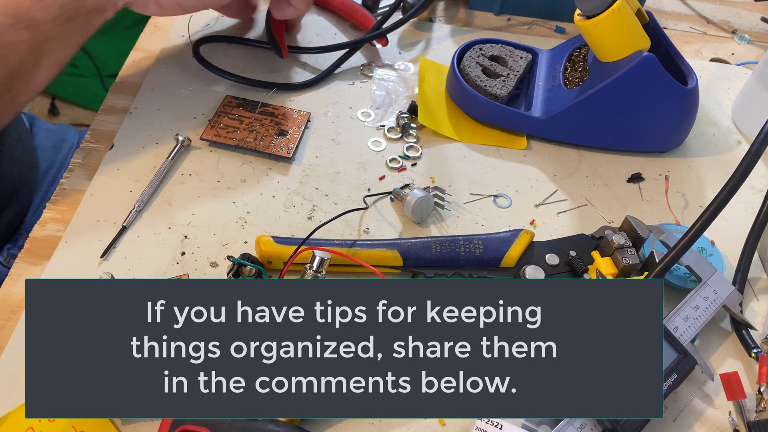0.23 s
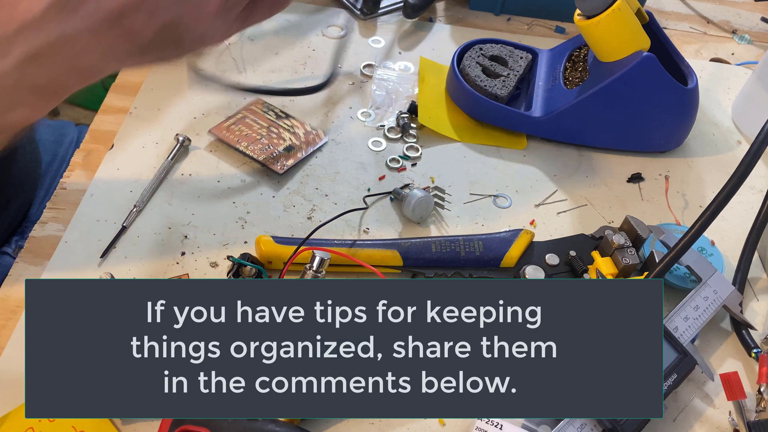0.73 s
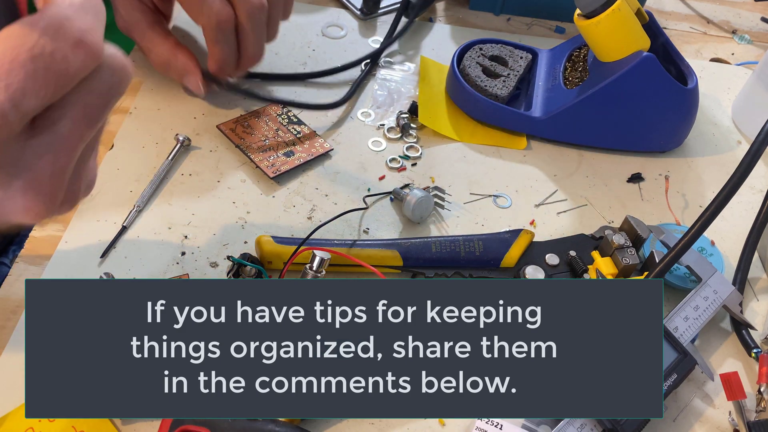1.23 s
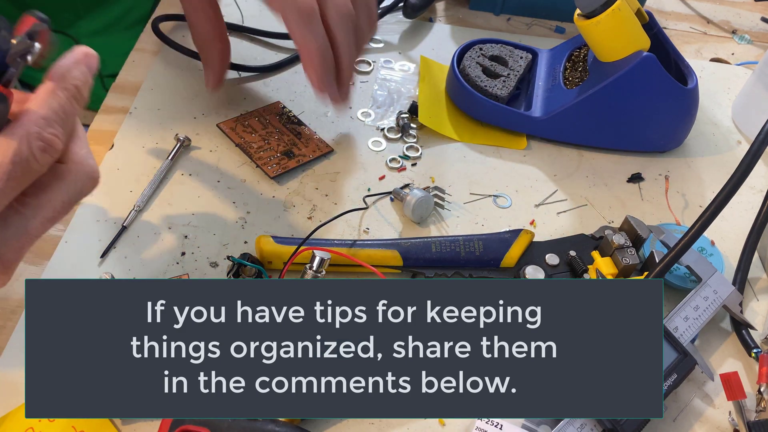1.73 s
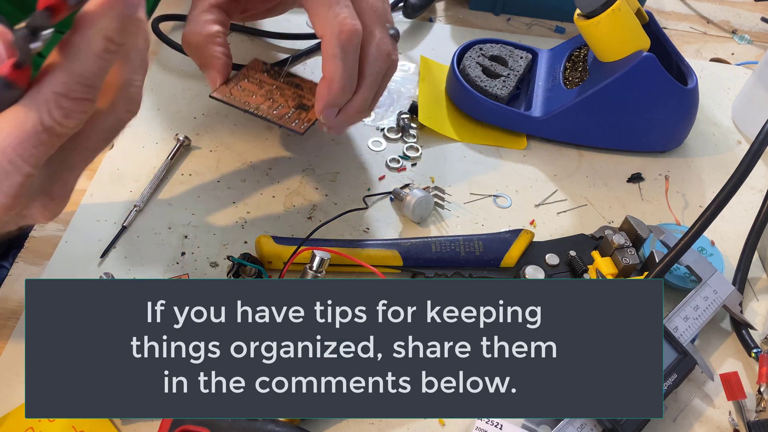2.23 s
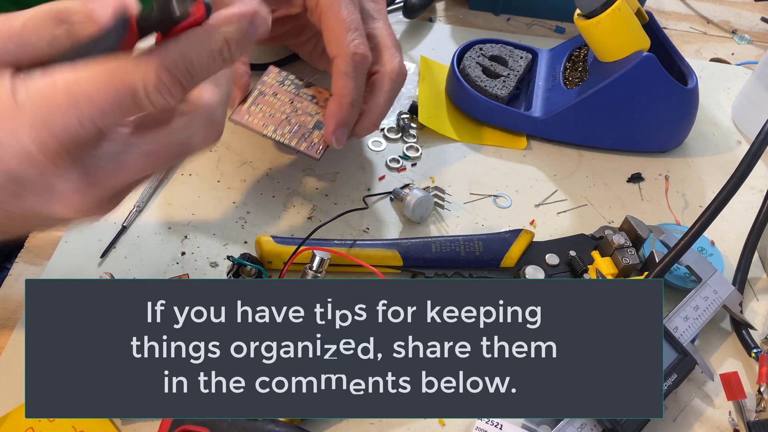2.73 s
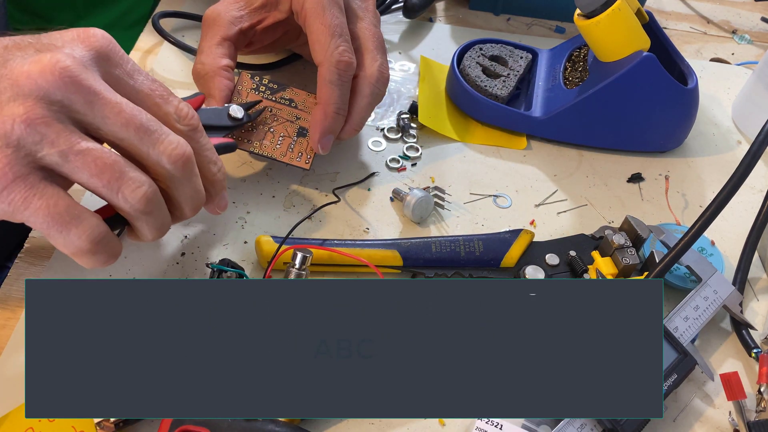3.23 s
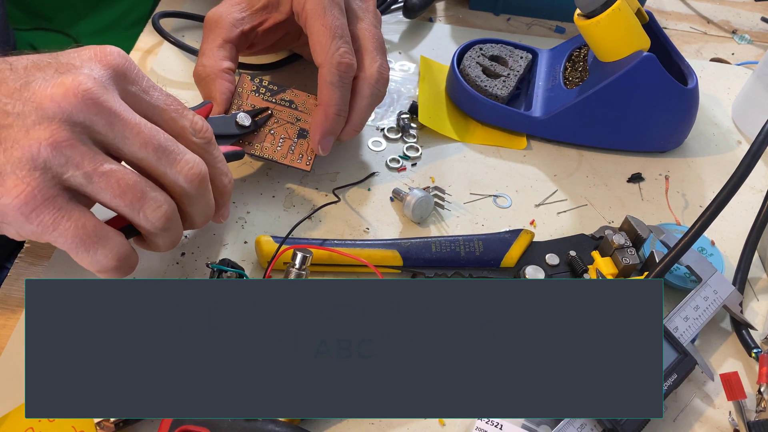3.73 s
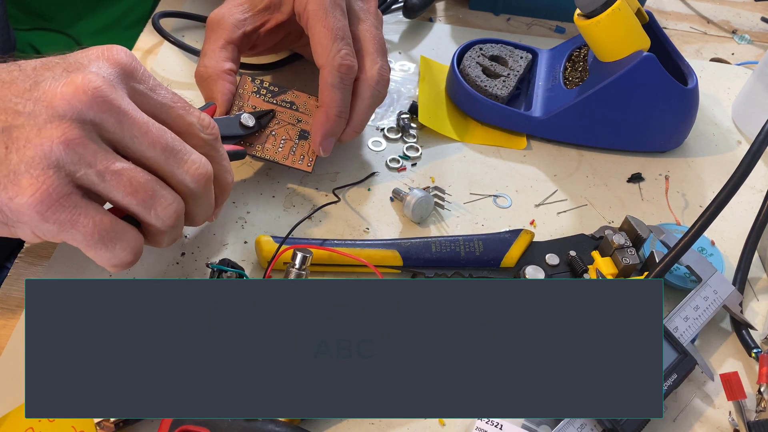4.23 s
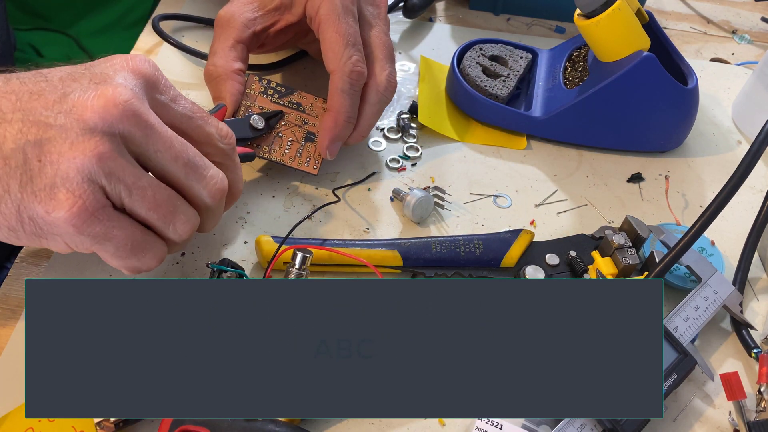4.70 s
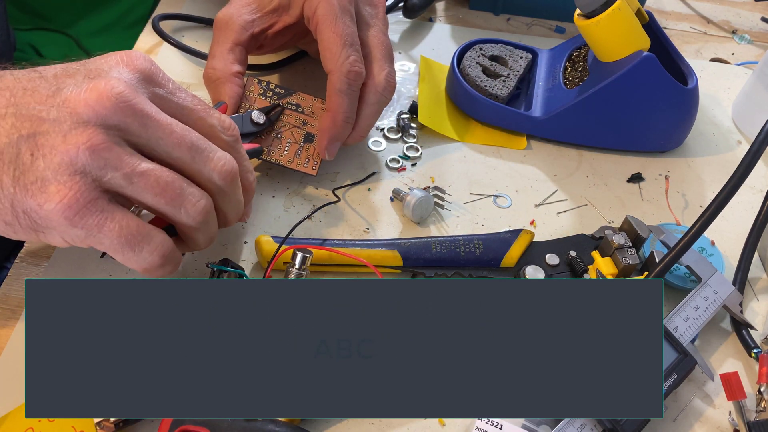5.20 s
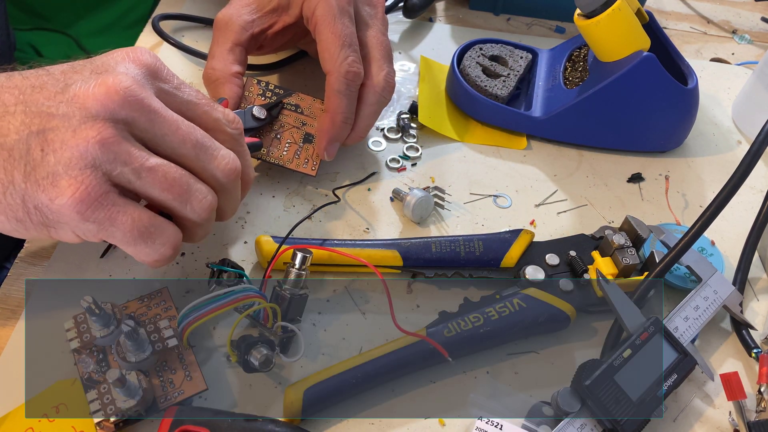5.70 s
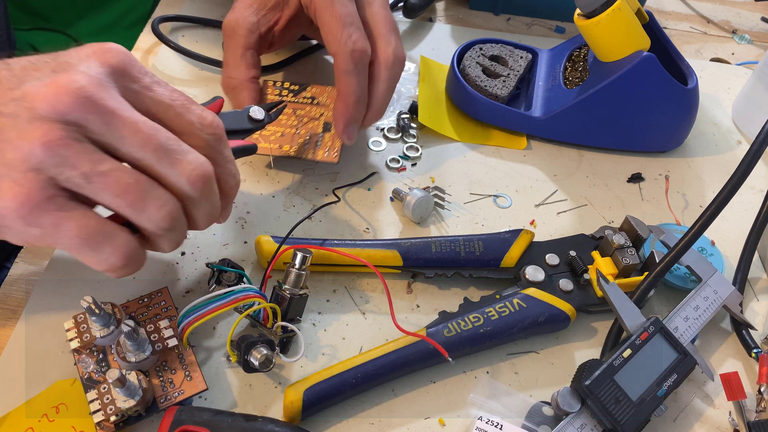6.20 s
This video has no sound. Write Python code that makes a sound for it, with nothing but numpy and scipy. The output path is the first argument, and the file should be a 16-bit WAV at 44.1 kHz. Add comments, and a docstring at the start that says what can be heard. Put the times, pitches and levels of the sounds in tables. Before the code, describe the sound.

A hand tool clatters hard on a cluttered wooden workbench, hands rustle, then small side cutters snip two wire ends over a low uneven room rumble.

```python
"""Tools and small parts on a wooden workbench, heard close up: a tool and a cable knock the bench and a loose
board, each blow built from a gritty click and ringing tones. Shaped noise makes the rubs, rustling hands and
sliding fingertips. Small ticks follow, and side cutters touch a circuit board, then snip two wire ends with
a burst of noise ringing the steel jaws. A low room rumble and a rush of air swell unevenly underneath."""
import sys
import numpy as np
from scipy import signal
from scipy.fft import rfft, irfft, next_fast_len
from scipy.io import wavfile
from scipy.ndimage import uniform_filter1d, map_coordinates

SR = 44100
rng = np.random.default_rng(int(sys.argv[2]) if len(sys.argv) > 2 else 0)


def to_wav(sig):
    """Store sig (one row per channel, or 1-D mono) as 16-bit WAV at the path in sys.argv[1].

    Samples outside -1..1 are clipped; the rate is SR.
    """
    pcm = np.clip(np.atleast_2d(sig), -1, 1) * 32767
    pcm = np.round(pcm).astype(np.int16)
    wavfile.write(sys.argv[1], SR, pcm.T)  # frames by channels


N = 284489
T = np.arange(SR // 4) / SR  # s, the clock of one short sound: a quarter second at most
SNAP_S = 0.0013  # the snap comes this long after the start


def amp(db):
    """Turn decibels into a plain multiplier."""
    return 10 ** (np.asarray(db) / 20)


def unit(x):
    """Scale a sound to an rms (average strength) of 1."""
    return x / np.sqrt(np.mean(x ** 2) + 1e-20)


def peak_one(x):
    """Scale a sound so its highest point is 1."""
    return x / np.abs(x).max()


def along(points, hz):
    """Read a curve of (pitch_hz, value) points, with pitch on a log axis."""
    point_hz, value = np.transpose(points)
    return np.interp(np.log(hz + 1), np.log(point_hz + 1), value)


def level_curve(points):
    """Join (time_s, level_db) points into one level per sample."""
    time_s, level_db = np.transpose(points)
    return np.interp(np.arange(N) / SR, time_s, level_db)


def wobble(rate):
    """A smooth random curve through this many random points a second."""
    knots = rng.standard_normal(int(N * rate / SR) + 4)
    return map_coordinates(knots, [np.arange(N) * rate / SR])


def filtered(x, response):
    """Multiply each frequency of a sound by a complex response."""
    size = next_fast_len(x.shape[-1] + 8192)
    spectrum = rfft(x, size) * response(np.fft.rfftfreq(size, 1 / SR))
    return irfft(spectrum, size)[..., :x.shape[-1]]


def peak(f, hz, width_hz):
    """One resonance: it passes its own pitch best and rings only after it is struck."""
    return 1j * f * width_hz / (hz * hz - f * f + 1j * f * width_hz + 1e-9)


def resonances(f, rows, power):
    """Add several resonances; flipping every other sign avoids deep gaps between them."""
    return sum((-1) ** k * amp(db) * peak(f, hz, width_hz) ** power
               for k, (hz, width_hz, db) in enumerate(rows))


# how alike left and right are: pitch_hz, likeness (1 = the same)
LIKENESS = [(60, 1), (250, 0.92), (950, 0.024), (15000, 0.077)]
# how much stronger left is than right: pitch_hz, left_over_right_db
LEFT_LEAN = [(60, -3), (2380, 3)]


def stereo_noise(gain):
    """Noise of rms 1 with a shared middle and opposite sides; more middle makes the channels more alike."""
    def middle_and_side(hz):
        angle = np.arccos(np.clip(along(LIKENESS, hz), -1, 1)) / 2
        return gain(hz) * [np.cos(angle), np.sin(angle)]

    mid, side = filtered(rng.standard_normal((2, N)), middle_and_side)
    left_right = np.array([mid + side, mid - side])
    return unit(filtered(left_right, lambda hz: amp(along(LEFT_LEAN, hz) * [[0.5], [-0.5]])))


def patchy(x, depth_db):
    """Give a sound random swells that differ from one pitch band to the next."""
    bands = signal.stft(x, nperseg=1024)[2]
    swells = rng.standard_normal(bands.shape[1:])
    swells = uniform_filter1d(swells, size=6, axis=0)  # smooth over pitch
    swells = uniform_filter1d(swells, size=8, axis=1)  # smooth over time
    return unit(signal.istft(bands * amp(depth_db * unit(swells)), nperseg=1024)[1][:, :N])


def ring(modes, attack, spread_db):
    """One blow starts several fading tones, each at a new strength and slightly off pitch; peak 1."""
    hz, db, t60 = np.transpose(modes)[:, :, None]
    strength, detune = rng.standard_normal((2, len(modes), 1))
    fade = amp(db + spread_db * strength - 60 * T / t60)
    tones = fade * np.sin(2 * np.pi * hz * (1 + 0.012 * detune) * T)
    onset = (1 - np.exp(-T / attack)) ** 2
    return peak_one(np.sum(tones, 0) * onset)


# small parts scraping: pitch_hz, width_hz, level_db
GRIT = [(2770, 500, -6.5), (4625, 1100, -5.5), (6200, 2600, -2.5), (12200, 1100, -11.5)]


def click(hz, sharp, rattle_db, t60, grit_share):
    """A short noisy onset centred on the snap, one main pitch, then a gritty rattle; peak 1."""
    lead_in = amp(-60 * np.abs(T - SNAP_S) / 0.004)
    rattle = amp(rattle_db - 60 * T / t60) * (1 - np.exp(-T / 0.001))
    force = (lead_in + rattle) * rng.standard_normal(len(T))
    force[round(SNAP_S * SR)] += 6  # the snap itself

    def response(f):
        main_pitch = peak(f, hz, hz / sharp) * peak(f, hz, 2 * hz / sharp)
        return grit_share * resonances(f, GRIT, 2) + main_pitch

    return peak_one(filtered(force, response))


def empty():
    """Stereo silence with a spare second for the last fade."""
    return np.zeros((2, N + SR))


def add(out, s, pan_db, sound):
    """Mix a sound in at a time; pan_db is how much stronger left is than right."""
    out[:, round(s * SR):][:, :len(sound)] += amp([[pan_db / 2], [-pan_db / 2]]) * sound


# level of the rumble before its random lumps: time_s, level_db
HUM_LEVEL = [(0.0, -50), (0.21, -48), (0.43, -51.5), (0.57, -33.5), (0.65, -45.5), (0.99, -38),
             (1.22, -44.5), (1.42, -48), (1.56, -38.5), (1.67, -52.5), (2.1, -49), (2.15, -44), (2.21, -51),
             (4.49, -49), (4.62, -53.5), (6.05, -51.5), (6.18, -41.5), (6.31, -52), (6.45, -39)]
# the deepest tones the room favours: pitch_hz, width_hz, level_db
ROOM_TONES = [(39.5, 34, -20), (61.6, 17, -2), (95.8, 8.2, 1), (121.5, 14, 0.5)]
# tone balance of the rushing air, only relative: pitch_hz, level_db (per Hz)
AIR_TONE = [(76, -30), (130, -8.5), (162, -20.5), (194, -13.5), (363, -22), (453, -19), (664, -28),
            (935, -21.5), (1240, -46.5), (1610, -43.5), (2510, -60), (4980, -71), (16000, -81)]
# a narrow resonance in the air: pitch_hz, width_hz, gain (plain multiplier)
AIR_PEAK = (1200, 60, 1.4)


def hum():
    """A low room rumble in random lumps, stronger around the bench thuds; a rush of air swells with it."""
    deep = stereo_noise(lambda f: resonances(f, ROOM_TONES, 1) * peak(f, 110, 200))
    deep_db = level_curve(HUM_LEVEL)
    lumps_db = 4.5 * wobble(17) + 2.9 * wobble(6)

    *air_peak, air_peak_gain = AIR_PEAK
    air = stereo_noise(lambda f: amp(along(AIR_TONE, f)) * (1 + air_peak_gain * peak(f, *air_peak)))
    gusts_db = 1.6 * wobble(9)
    air_db = -56.5 + 0.45 * (deep_db + 48.0) + gusts_db
    return amp(deep_db + lumps_db) * deep + amp(air_db) * patchy(air, depth_db=2.0)


# fingertips sliding on the circuit board: time_s, level_db
FINGER_LEVEL = [(0.0, -80.5), (0.4, -71), (0.7, -96), (2.0, -80.5), (2.2, -83), (2.3, -68.5), (2.95, -72),
                (3.1, -94)]
# tones the sliding excites: pitch_hz, width_hz, level_db
SLIDE_TONES = [(1485, 150, 4.5), (3381, 1396, -20.5)]


def fingers():
    """Skin sticks and slips on the board: resonant noise in random lumps."""
    lumps = amp(2.458 * wobble(25) + 2.2 * wobble(150))
    slide = stereo_noise(lambda f: sum(amp(db) * peak(f, hz, width_hz) ** 2
                                       for hz, width_hz, db in SLIDE_TONES))
    return amp(level_curve(FINGER_LEVEL)) * unit(lumps * slide)


# skin and cable rustling: time_s, level_db
HAND_LEVEL = [(0.0, -100), (0.3, -84.5), (0.72, -81.5), (1.08, -86.5), (1.17, -87.5), (1.22, -74),
              (1.45, -76), (1.71, -80), (2.06, -80.5), (2.21, -92), (2.86, -83.5), (3.27, -94.5),
              (5.9, -99), (6.1, -92.5), (6.45, -83.5)]
# tone balance of the rustle, only relative: pitch_hz, level_db (per Hz)
RUSTLE_TONE = [(1250, -33), (1480, -7), (2100, -12.5), (4200, -10), (7600, -14.5), (9200, -25),
               (11700, -12), (13200, -49)]


def handling():
    """Skin and cable crackle in clumps: noise with slow and fast random swells."""
    clumps = amp(1.6 * wobble(36) + 1.7 * wobble(310))
    rustle = patchy(stereo_noise(lambda hz: amp(along(RUSTLE_TONE, hz))), depth_db=4.5)
    return amp(level_curve(HAND_LEVEL)) * unit(clumps * rustle)


# rubs and shoves along the bench: start_s, length_s (cut at 0.25), level_db, pitch_hz
RUBS = [(0.449, 0.1, -55.5, 1760), (0.473, 0.048, -53, 6535), (0.517, 0.054, -45.5, 5010),
        (0.525, 0.11, -31.5, 62.6), (0.59, 0.065, -66, 6000), (0.757, 0.27, -59, 4960),
        (0.89, 0.16, -28, 249.4), (0.977, 0.086, -53.5, 1760), (2.896, 0.11, -47.5, 452),
        (2.889, 0.098, -77, 5000)]
RUB_WIDTH, RUB_WIDENS_HZ = 0.34, 3552  # resonance width over pitch; it doubles at this pitch


def rubs():
    """Uneven friction excites one broad resonance while the stroke swells and fades."""
    out = empty()
    for s, length, db, hz in RUBS:
        width_hz = RUB_WIDTH * hz * (1 + (hz / RUB_WIDENS_HZ) ** 2)
        roughness_db = 3.0 * map_coordinates(rng.standard_normal(110), [T * 400])  # 400 points a second
        friction = amp(roughness_db) * rng.standard_normal(len(T))
        stroke = np.sin(np.pi * np.clip(T / length, 0, 1) ** 0.6) ** 1.3
        rub = unit(filtered(friction, lambda f: peak(f, hz, width_hz) ** 2 / (1 + (f / 12500) ** 8)))
        add(out, s, 0, amp(db) * stroke * rub)
    return out[:, :N]


# tool and cable striking the bench clutter: start_s, click_level_db, clack_level_db, click_pitch_hz
CONTACTS = [(0.4592, -43, -49.5, 4660), (0.4716, -50, -47, 4300), (0.483, -31.5, -59, 7560),
            (0.519, -33, -23.5, 7160), (0.5249, -24.5, -25, 7060), (0.5397, -32.5, -36, 7300),
            (0.546, -40, -44.5, 5800), (0.593, -46, -78, 6140), (0.605, -41, -66, 7600),
            (0.8033, -29.5, -41, 4260), (0.8301, -4, -18, 4800), (0.872, -49, -39, 5000),
            (0.9118, -27.5, -42.5, 4700), (0.9506, -28.5, -33, 6540), (0.9552, -22, -28, 4800),
            (1.072, -68, -42.5, 3920), (1.493, -33, -36, 3660), (1.502, -32, -63, 6380),
            (1.5935, -57, -39.5, 3200)]
# tones of a loose board: pitch_hz, level_db, t60_s (time to fade by 60 dB)
BOARD_TONES = [(860, 2, 0.026), (1009, -7, 0.0488), (1468.5, -11.5, .03), (1780, -8.5, 0.028),
               (1998, -4.5, .03), (2624, -16, 0.018)]
RATTLE_DB = -6  # strength of the click's rattle, before hard blows dry it
HARD_DB, DRIER = -26.5, 0.41  # clicks above this level rattle less, by this many dB per dB
BRIGHTEN = 1  # dB per octave of extra board treble for each dB the click stands over the clack


def contacts():
    """Each blow clicks and clacks a loose board over a dry rattle; sharper blows reach its higher tones."""
    out = empty()
    for s, db, clack_db, hz in CONTACTS:
        click_rattle_db = RATTLE_DB - DRIER * max(db - HARD_DB, 0)
        add(out, s, 1.8, amp(db) * click(hz, 4.0, click_rattle_db, t60=0.045, grit_share=0.28))

        fading_noise = amp(-60 * T / 0.07) * rng.standard_normal(len(T))
        rattle = peak_one(filtered(fading_noise, lambda f: peak(f, 1300, 1600) ** 2 / (1 + (f / 2600) ** 4)))
        tilt = BRIGHTEN * np.clip(db - clack_db, -14, 11)  # dB per octave
        tilted_board = [(f, level + tilt * np.log2(f / BOARD_TONES[0][0]), t60)
                        for f, level, t60 in BOARD_TONES]
        tone = ring(tilted_board, attack=0.00065, spread_db=1.5)
        clack = 1.1 * tone + 0.63 * amp(min(tilt, 0)) * rattle  # a soft click also means less rattle
        add(out, s + SNAP_S, 0, amp(clack_db) * clack)
    return out[:, :N]


# weight landing on the bench top: start_s (the ring follows SNAP_S later), level_db
KNOCKS = [(0.476, -29.5), (0.516, -27), (0.802, -22.5), (0.829, -14.5), (0.873, -26), (0.957, -18.5),
          (1.036, -30), (1.069, -31), (1.493, -26.5)]
# tones of the bench top: pitch_hz, level_db, t60_s (time to fade by 60 dB)
BENCH_TONES = [(120, -13, 0.028), (225.4, -7.5, 0.028), (257.6, 4.5, 0.052), (341.9, -5, 0.082),
               (455, -4, 0.06), (594.2, -3, 0.035), (866, -5.5, 0.018)]


def knocks():
    """Every landing rings the bench top anew with short fading tones."""
    out = empty()
    for s, db in KNOCKS:
        add(out, s + SNAP_S, -1.8, amp(db) * ring(BENCH_TONES, attack=0.0017, spread_db=2.0))
    return out[:, :N]


# cable, jaws and loose wire ends ticking; the clipped end skitters after the last snip:
# start_s, level_db, pitch_hz, grit_share (plain multiplier)
TICKS = [(1.2577, -45, 11750, 0.016), (1.9742, -46.5, 12100, 0.08), (2.4057, -50.5, 6470, 0.63),
         (2.912, -57.5, 6300, 0.47), (3.0371, -57, 2680, 0.64), (4.7549, -55, 2770, 0.45),
         (5.292, -68.5, 2910, 0.31), (5.4486, -71, 3260, 0.4), (6.0758, -54, 12650, 0.14),
         (6.1029, -62, 13000, .12), (6.114, -64, 12750, 0.11), (6.1431, -64, 10000, 0.17),
         (6.155, -67, 12700, .08), (6.1923, -68, 12650, 0.089), (6.2137, -62.5, 12800, 0.086),
         (6.2406, -64, 12830, 0.081), (6.325, -52.5, 6120, 0.43), (6.3425, -50, 6100, .5),
         (6.3714, -58.5, 6010, 0.56), (6.402, -54.5, 8300, 0.55)]
TICK_WIDTH_HZ = 380


def ticks():
    """Small hard parts touch: narrow clicks with a little gritty rattle."""
    out = empty()
    for s, db, hz, grit_share in TICKS:
        tick = click(hz, hz / TICK_WIDTH_HZ, rattle_db=-5.5, t60=0.055, grit_share=grit_share)
        add(out, s, 0.8, amp(db) * tick)
    return out[:, :N]


# the cutters touch the circuit board, then snip two wire ends:
# start_s, level_db, jolt_level_db, left_over_right_db, jolt_pitch_factor, jaw_tilt (dB per octave)
SNIPS = [(3.409, -66, -44.5, 4.5, 0.83, -10), (4.7194, -20.5, -30.5, 2.5, 1.01, 2.5),
         (5.998, -30, -30.5, 3.5, 0.96, -0.5)]
# tones of the steel jaws: pitch_hz, level_db, t60_s (time to fade by 60 dB)
JAW_TONES = [(2929, -1, 0.013), (3827, -7.5, 0.0099), (4547, -3.5, 0.01), (5576, -2, 0.0086),
             (6657, 5, 0.0094), (7600, 8, 0.0064), (10270, -3, 0.0077), (11670, 1, 0.0057),
             (14640, -17, .002)]
# tones of the jolted circuit board, before the pitch factor: pitch_hz, level_db, t60_s
JOLT_TONES = [(1094, -1.5, 0.015), (1280, 6, 0.011), (1396, 9.5, 0.016)]


def cutters():
    """The jaws snap and chatter on, a noisy force ringing the steel; the board takes the jolt."""
    out = empty()
    for s, db, jolt_db, pan_db, pitch, tilt_db in SNIPS:
        lead_in = amp(-20.5 - 60 * np.abs(T - SNAP_S) / 0.004)
        chatter = amp(-36 - 60 * T / 0.076)
        force = (lead_in + chatter) * rng.standard_normal(len(T))
        force[round(SNAP_S * SR)] += 1  # the snap itself

        tilted_jaws = [(f, level + tilt_db * np.log2(f / 6000), t60) for f, level, t60 in JAW_TONES]
        steel = ring(tilted_jaws, attack=0.0001, spread_db=2)
        crunch = signal.fftconvolve(force, steel)[:len(T)]
        add(out, s, pan_db, amp(db) * peak_one(crunch))

        board = [(pitch * f, level, t60) for f, level, t60 in JOLT_TONES]
        add(out, s + SNAP_S, pan_db, amp(jolt_db) * ring(board, attack=0.0005, spread_db=1))
    return out[:, :N]


# how fast the room's answer dies: pitch_hz, t60_s (time to fade by 60 dB)
WALL_FADE = [(200, 0.37), (2000, 0.12), (10000, 0.009)]


def walls(x):
    """The room answers with fading noise; each pitch dies at its own speed."""
    hz, t, bands = signal.stft(rng.standard_normal((2, SR // 3)), SR, nperseg=256)
    fade = amp(-60 * t / along(WALL_FADE, hz)[:, None])
    tail = signal.istft(bands * fade, SR, nperseg=256)[1]
    tail = tail / np.linalg.norm(tail[0])
    delayed = np.pad(x, (150, 0))  # samples before the answer starts
    return signal.fftconvolve(delayed[None], tail, axes=1)[:, :N]


# how far left leads right between the two microphone ports: pitch_hz, lead (radians)
PORT_LEAD = [(60, 0.067), (400, 0.25), (1200, 1.5), (4200, 0.9)]
# fixed dips in the tone of every hit: pitch_hz, width_hz, depth (0 to 1)
TONE_DIPS = [(3390, 270, .85), (9024, 1100, 0.7)]


def ports_and_dips(x):
    """The ports hear a sound at slightly different moments; fixed dips weaken some pitches of every hit."""
    def response(f):
        ports = np.exp(1j * along(PORT_LEAD, f) * [[0.5], [-0.5]])
        dips = np.prod([1 - np.clip(depth, 0, 1) * peak(f, hz, width_hz)
                        for hz, width_hz, depth in TONE_DIPS], axis=0)
        return ports * dips

    return filtered(x, response)


def scene():
    """Mix the bench sounds and their room answer with the hum and the hands."""
    background = hum() + fingers() + handling()
    hits = ports_and_dips(rubs() + contacts() + knocks() + ticks() + cutters())
    without_bass = filtered(hits.mean(0), lambda hz: (1j * hz / (300 + 1j * hz)) ** 2)
    return background + hits + amp(-14.5) * walls(without_bass)


TOP_HZ = 16900


def record(dry):
    """The microphone keeps nothing above its top frequency."""
    return filtered(dry, lambda hz: hz < TOP_HZ)


dry = scene()
out = record(dry)
to_wav(out)
```